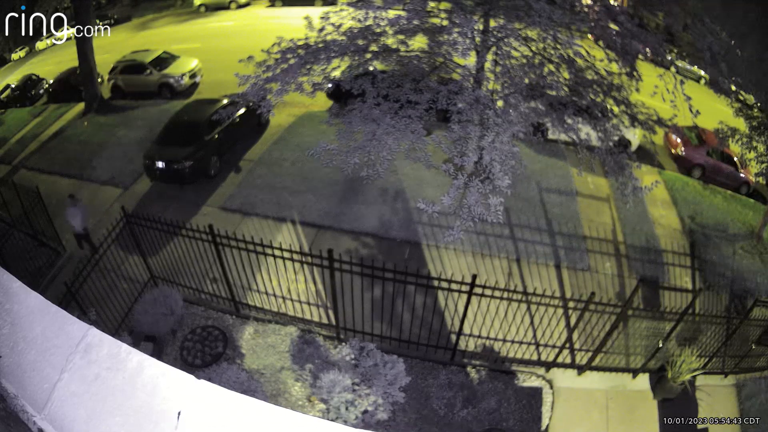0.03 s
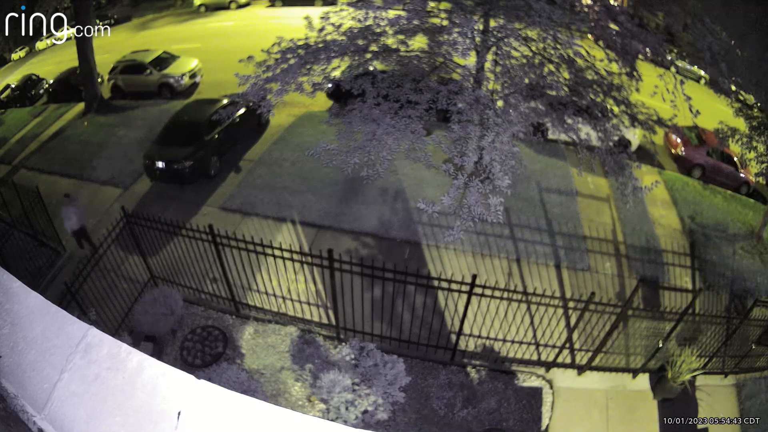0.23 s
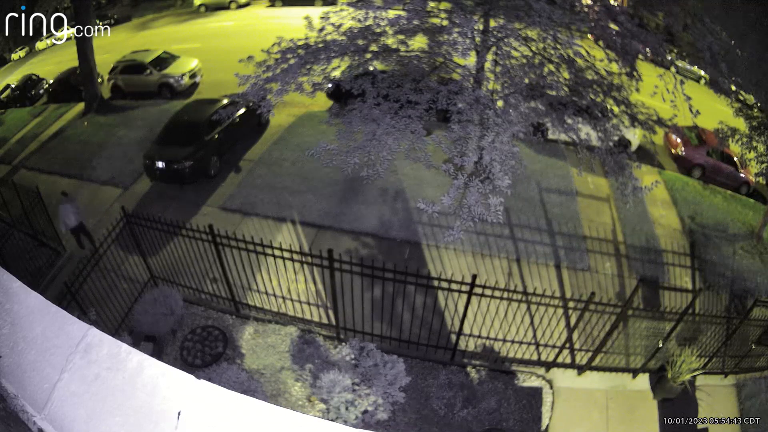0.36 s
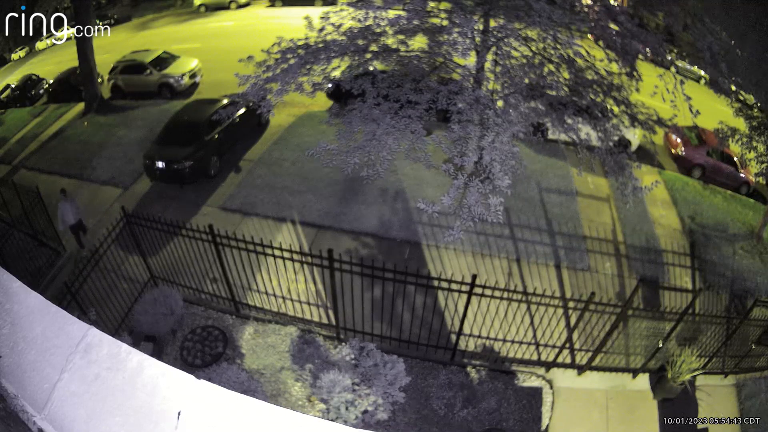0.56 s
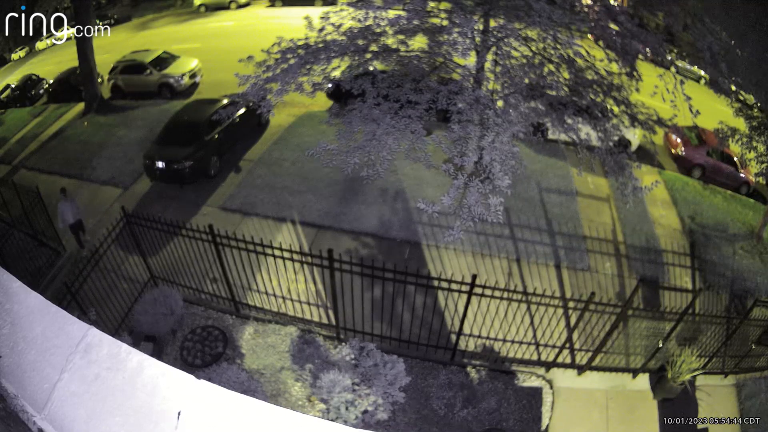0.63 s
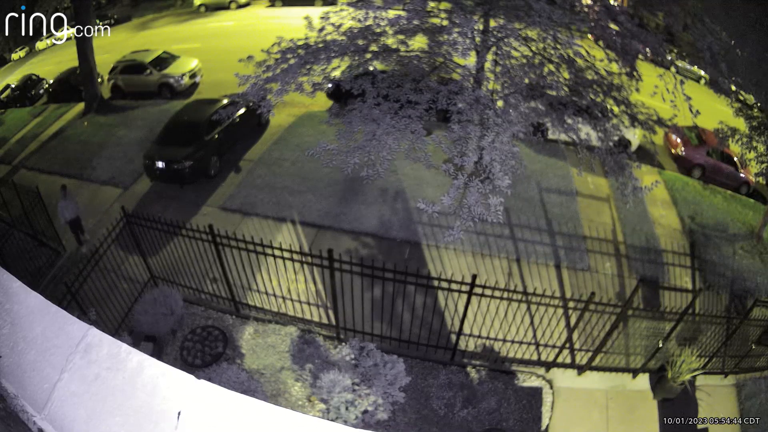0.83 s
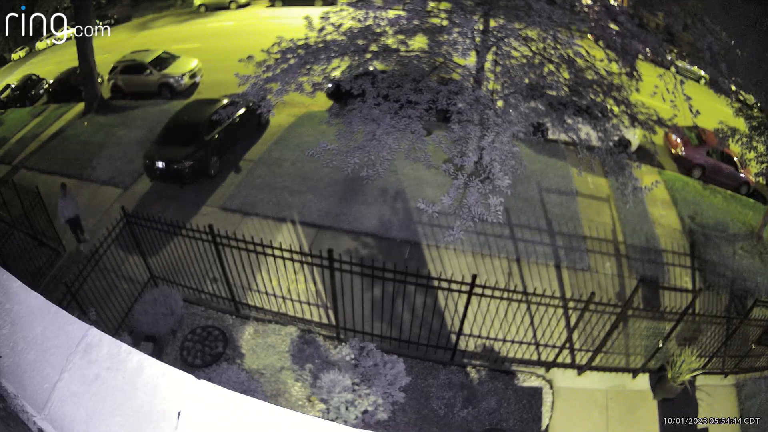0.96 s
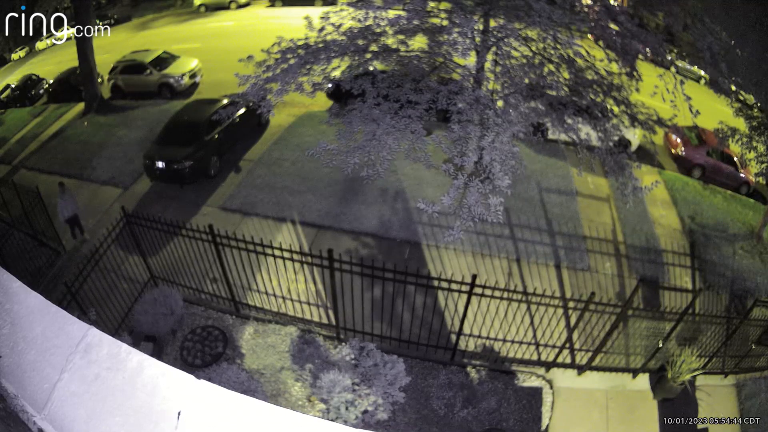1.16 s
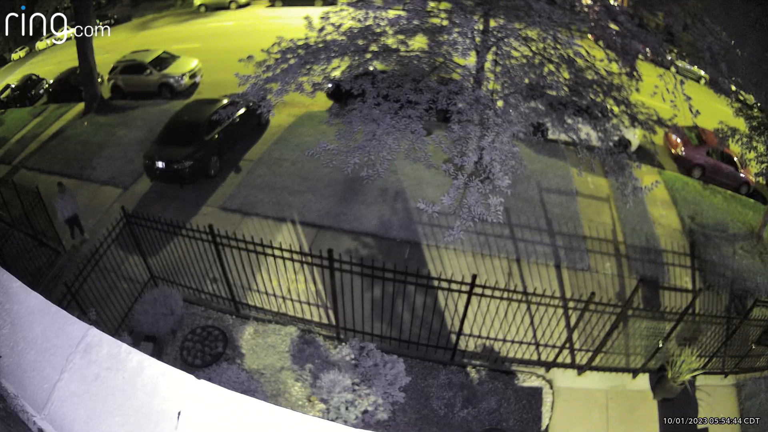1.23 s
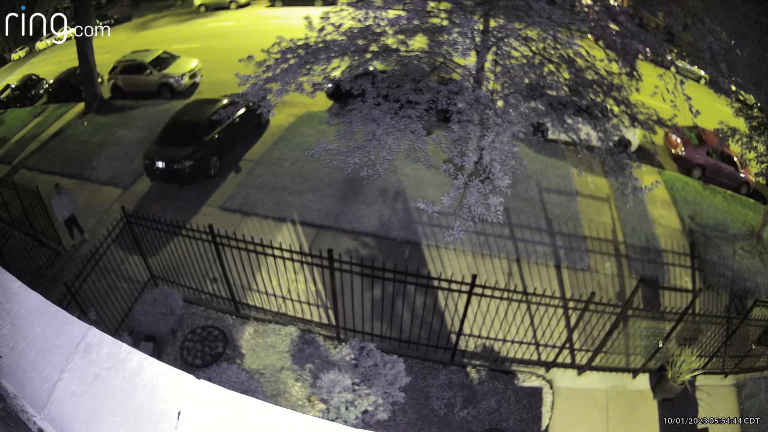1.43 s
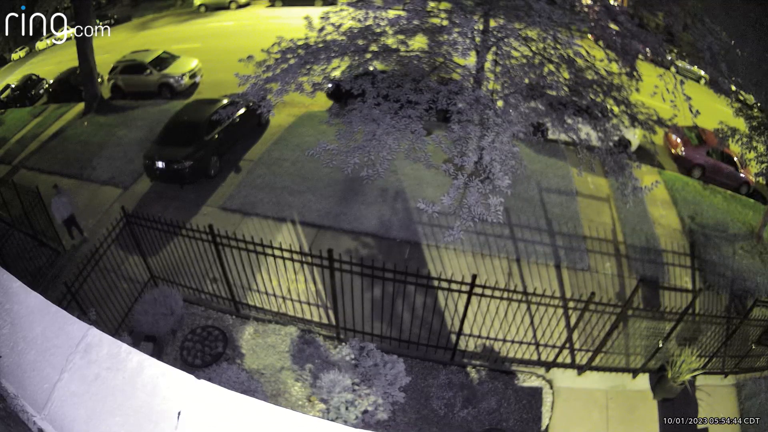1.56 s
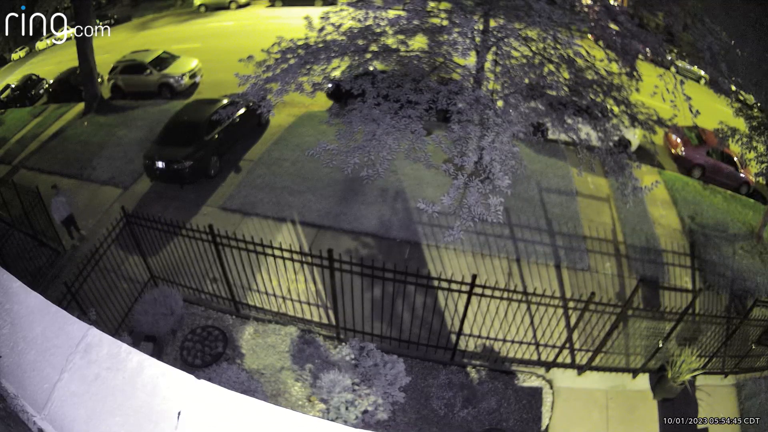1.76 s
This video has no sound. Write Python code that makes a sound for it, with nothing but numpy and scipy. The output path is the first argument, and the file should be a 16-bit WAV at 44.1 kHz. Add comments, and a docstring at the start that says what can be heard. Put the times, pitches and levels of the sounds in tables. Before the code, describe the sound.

Glass shattering outdoors with a noisy burst, tinkling pieces, then a dull, echoing bang.

```python
"""Glass breaking in a street at night, taken in mono on a narrow-band outdoor microphone.
A double snap sets off a rough rush of noise. Then small shards spill over a low crunch, and bigger
pieces clink against each other, each ringing in its own modes, with echoes off the near walls.
Last, a dull bang rings between the house fronts and dies away."""
import sys
import numpy as np
from scipy import signal
from scipy.fft import rfft, irfft
from scipy.io import wavfile

SR = 44100
rng = np.random.default_rng(int(sys.argv[2]) if len(sys.argv) > 2 else 0)


def digitize_waveform(pressure):
    """Quantize a signal to 16-bit integers and store it at the path in sys.argv[1].

    Rows of a 2-D input are taken as channels; values are limited to [-1, 1].
    """
    field = np.atleast_2d(pressure).T
    bounded = np.clip(field, -1, 1)
    quanta = np.round(bounded * 32767).astype(np.int16)
    wavfile.write(sys.argv[1], SR, quanta)


N = 79380
T = np.arange(N) / SR
WALLS_T60_S, STREET_T60_S = .29, 1.27
# spectrum of the street's echo and background (frequency [Hz], level [dB])
STREET_COLOUR = [(25, -16.5), (120, -1), (400, -1), (1000, 0.5), (1500, 0), (2200, -2.5), (3000, -9),
                 (3650, -4.5), (4500, -15), (6500, -24)]


def undb(db):
    """Decibels to gain."""
    return 10 ** (np.asarray(db) / 20)


def unit(x):
    """Scale to rms 1."""
    return x / np.sqrt(np.mean(x ** 2) + 1e-18)


def curve(table, column):
    """Gain over time from one dB column, silent outside the table."""
    rows = np.array(table)
    return undb(np.interp(T, rows[:, 0], rows[:, column], left=-140, right=-140))


def coloured(points, source=None):
    """Noise, or a given source, filtered by a spectrum of (Hz, dB) points; rms 1."""
    hz, db = np.array(points).T
    bin_hz = np.maximum(np.arange(N // 2 + 1) * SR / N, 1)
    gain = undb(np.interp(np.log(bin_hz), np.log(hz), db))
    x = rng.standard_normal(N) if source is None else source
    return unit(irfft(rfft(x) * gain, N))


def fade(start, t60, attack=1 / SR):
    """A straight attack and an exponential decay."""
    age = np.maximum(T - start, 0)
    return np.minimum(age / attack, 1) * np.exp(-np.log(1000) * age / t60)


def ticks(per_s):
    """Impulses of random time and strength."""
    return (rng.random(N) < per_s / SR) * rng.standard_normal(N)


def ring(modes, start, attack):
    """Decaying modes (Hz, dB, t60 in s) struck at one moment."""
    first = int(start * SR)
    age, out = T[:min(N - first, SR // 2)], np.zeros(N)
    tones = sum(undb(db - 60 * age / t60) * np.sin(2 * np.pi * hz * age) for hz, db, t60 in modes)
    out[first:first + len(age)] = tones * np.minimum(age / attack, 1)
    return out


def background():
    """The night street: a very faint, steady noise."""
    return undb(-89.5) * coloured(STREET_COLOUR)


def snaps():
    """Two short bursts of noise, a few milliseconds apart."""
    # the bursts (time [s], level [dB], t60 [s])
    bursts = [(.2252, -17, 0.027), (0.2316, -21, 0.016)]
    # their spectrum (frequency [Hz], level [dB])
    colour = [(60, -22), (170, -10), (340, 3.5), (1150, 0), (1750, -13.5), (2550, 3.5), (3750, -7.5),
              (6900, -5.5)]
    return coloured(colour) * sum(undb(db) * fade(start, t60) for start, db, t60 in bursts)


def gritty(grit=.4):
    """Smooth noise roughened with dense grains."""
    return rng.standard_normal(N) * (1 - grit) + grit * unit(ticks(per_s=1500))


def rush():
    """A gritty rush of noise that swells twice, a low body under a hiss."""
    # course of the rush (time [s], body level [dB], hiss level [dB])
    levels = [(.155, -73, -71), (.173, -60.5, -50.5), (.214, -47.5, -44.5), (.24, -33.5, -39.5),
              (.252, -28, -32), (.274, -25, -23.5), (.336, -36.5, -29.5), (.36, -32, -30.5),
              (.426, -39, -33), (.51, -35, -32.5), (.545, -33, -29.5), (.62, -34.5, -31.5),
              (.708, -50.5, -43), (.77, -53.5, -38.5), (.86, -84, -70)]
    # spectra of body and hiss (frequency [Hz], level [dB])
    body_colour = [(25, -33), (100, -21.5), (190, -16.5), (270, -3.5), (410, 1.5), (530, -0.5), (700, -7),
                   (950, -1.5), (1250, -2.5), (1700, -11), (2600, -24.5), (7000, -45)]
    hiss_colour = [(700, -27.5), (1700, -5.5), (2450, 4), (3300, -2), (4000, 0.5), (4650, -4), (5250, 3.5),
                   (5900, -2), (6900, -8)]
    body = coloured(body_colour, gritty()) * curve(levels, column=1)
    hiss = coloured(hiss_colour, gritty()) * curve(levels, column=2)
    return body + hiss


def shards(count=2000, low_hz=1700, high_hz=7200, mean_t60_s=.049, spread_db=5.5):
    """Many small splinters of glass ping briefly over a low crunch."""
    # course of the spill (time [s], shard level [dB], crunch level [dB])
    levels = [(.72, -45, -52), (.76, -40.5, -50.5), (.805, -34, -33.5), (.838, -36, -36.5),
              (.854, -22.5, -34.5), (.895, -23.5, -36.5), (.955, -23, -40.5), (.99, -31.5, -40.5),
              (1.04, -29, -46), (1.11, -30, -50.5), (1.2, -46, -52.5), (1.238, -41, -44), (1.3, -50, -52.5),
              (1.33, -51, -47), (1.366, -44.5, -40.5), (1.42, -67.5, -70)]
    # spectra of shards and crunch (frequency [Hz], level [dB])
    shard_colour = [(1700, -17), (2300, -8), (2700, -3), (3100, 1.5), (3700, 3), (4300, -2), (5000, -4),
                    (5700, 3), (6200, -1), (6800, -11.5)]
    crunch_colour = [(25, -32), (55, -21.5), (110, -9), (280, -5.5), (600, -2), (1200, 0), (1900, 2.5),
                     (2700, -0.5), (3500, -7.5), (7000, -14.5)]
    first, last = levels[0][0], levels[-1][0]
    age, spill = T[:N // 24], np.zeros(2 * N)
    for when, pitch, strength, length in rng.random((count, 4)):
        hz = low_hz + (high_hz - low_hz) * pitch
        t60 = mean_t60_s * (.5 + length)
        ping = np.sin(2 * np.pi * hz * age) * np.exp(-np.log(1000) * age / t60)
        i = int((first + when * (last - first)) * SR)
        spill[i:i + len(age)] += undb(spread_db * (2 * strength - 1)) * ping
    pings = coloured(shard_colour, spill[:N]) * np.sqrt((last - first) * SR / N)  # rms 1 while it lasts
    return pings * curve(levels, column=1) + coloured(crunch_colour) * curve(levels, column=2)


def clinks(settle_s=1.17):
    """Each contact cracks and rings one piece of glass; the near walls and the street echo it."""
    # modes of each named piece (frequency [Hz], level [dB], t60 [s])
    pieces = { "thin": [(1612, -18, .22), (2960, -3, .15), (5444, -17, .1), (6728, -7, .07),
              (6775, -1, .11), (6893, -4.5, .18)], "short": [(1622, -19, .15), (4666, 0, .16),
              (4689, -7, .14), (6805, -12.5, .12)], "middle": [(3502, -4, .27), (3531, -10, .2),
              (5436, -5, .25), (5456, -8, .2), (6546, -2.5, .25)], "large": [(2556, -18, .08),
              (3601, -9.5, .13), (3660, 2, .22), (3688, -12, .18), (3988, -13, .15), (4120, -10, .15),
              (5629, -3, .25), (5673, -.5, .25), (6312, -9, .06), (6472, -7, .07), (6570, -10, .12)], }
    # glass striking glass (time [s], piece, level [dB], treble tilt [dB/octave])
    contacts = [(.7525, "thin", -31.5, 1.5), (.7648, "thin", -15.5, 5), (.7825, "thin", -26, -6),
                (.796, "short", -24, -9), (.8115, "middle", -30.5, -17), (.8548, "large", -17, 5),
                (.8712, "large", -30, 4), (.9025, "large", -26.5, -7.5), (.9228, "large", -25, -3.5),
                (.9462, "thin", -28.5, -13.5), (.9512, "large", -27.5, -4), (.9745, "middle", -29, 2),
                (.9975, "large", -26.5, -2), (1.0222, "short", -25, 2), (1.0392, "middle", -23, -7),
                (1.0633, "short", -24, 3.5), (1.082, "short", -31, 4.5), (1.0912, "middle", -22.5, -2.5),
                (1.1062, "short", -28, 3.5), (1.1297, "large", -25, -16.5), (1.1512, "large", -26, -17.5),
                (1.1792, "large", -27.5, -11.5), (1.2124, "large", -32.5, -19), (1.229, "large", -33, -18),
                (1.2422, "large", -37.5, 2.5), (1.2652, "large", -33, -11.5), (1.3142, "large", -38.5, -18)]
    # spectrum of a contact's crack (frequency [Hz], level [dB])
    crack_colour = [(800, -19.5), (2000, -6.5), (4000, -0.5), (5000, 2.5), (6500, -1.5)]
    direct, crack = np.zeros(N), coloured(crack_colour)
    for start, piece, db, tilt_db in contacts:
        t60_scale = .51 if start > settle_s else 1  # rocking on the ground shortens the ring
        modes = [(hz, mode_db + tilt_db * np.log2(max(hz, 3400) / 4500), t60 * t60_scale)
                 for hz, mode_db, t60 in pieces[piece]]
        click = undb(-5) * crack * fade(start, t60=.013)
        direct += undb(db) * (ring(modes, start, attack=.006) + click)
    near = with_echoes(direct, db=-4.5, t60=WALLS_T60_S)
    return with_echoes(near, db=-25, t60=STREET_T60_S)


def with_echoes(x, db, t60):
    """The sound plus its dense reflections from the house fronts."""
    reflections = ticks(per_s=900) * fade(0, t60, attack=.008)
    return x + undb(db) * signal.fftconvolve(x, reflections / np.linalg.norm(reflections))[:N]


def bang(start=1.369, chirp_from_hz=2200, chirp_to_hz=703, chirp_fall_s=.009):
    """A rough knock with a falling chirp; noise swells behind it, something rings, the street echoes."""
    # spectra of the bang's noisy parts (frequency [Hz], level [dB])
    knock_colour = [(150, -29), (600, -14.5), (1000, 4.5), (1900, 1), (2600, 1), (3200, -12), (7000, -21.5)]
    boom_colour = [(25, -33.5), (80, -16), (140, -7.5), (205, 5), (270, 0.5), (480, 4), (750, -3),
                   (1300, -15.5), (4000, -52)]
    crack_colour = [(200, -20), (600, -10), (930, 0), (1180, -3.5), (1500, -1.5), (1950, -2), (2500, -8),
                    (3200, -9.5), (7000, -28)]
    hiss_colour = [(1200, -27), (2900, -3.5), (3700, 3.5), (4600, -3.5), (5600, -1.5), (6800, -12.5)]
    age = np.maximum(T - start, 0)

    def swell(colour, db, attack, hold, sag_db_per_s, t60):
        """Noise that builds, sags until the hold time is over, then dies away."""
        held = np.minimum(age / attack, 1) * undb(db - sag_db_per_s * np.minimum(age, hold))
        release = np.exp(-np.log(1000) * np.maximum(age - hold, 0) / t60)
        return coloured(colour) * held * release

    echo = undb(-41) * coloured(STREET_COLOUR) * fade(start, STREET_T60_S, attack=.06)
    knock = undb(-22) * coloured(knock_colour) * fade(start, t60=.25)
    boom = swell(boom_colour, db=-31, attack=.016, hold=.12, sag_db_per_s=36, t60=.2243)
    crack = swell(crack_colour, db=-24.5, attack=.06, hold=.12, sag_db_per_s=35, t60=.2662)
    hiss = swell(hiss_colour, db=-32, attack=.13, hold=.125, sag_db_per_s=28, t60=.2953)
    hz = chirp_to_hz + (chirp_from_hz - chirp_to_hz) * np.exp(-age / chirp_fall_s)
    phase = 2 * np.pi * np.cumsum(hz * (age > 0)) / SR
    chirp = undb(-19) * np.sin(phase) * fade(start, t60=.05, attack=.0019)
    ringing = ring([(1435, -32, .26), (1454, -24.5, .38), (1640, -40, .3)], start + .042, attack=.0074)
    return knock + with_echoes(chirp, db=-5, t60=WALLS_T60_S) + boom + crack + hiss + ringing + echo


def scene():
    """All sources at one microphone in the street, the same in both channels."""
    mono = snaps() + rush() + clinks() + shards() + bang() + background()
    return np.array([mono, mono])


def record(dry):
    """The narrow-band microphone and recorder cut the treble steeply."""
    top_hz = 6950
    return signal.sosfilt(signal.ellip(12, .2, 85, top_hz, fs=SR, output="sos"), dry)


dry = scene()
out = record(dry)
digitize_waveform(out)
```